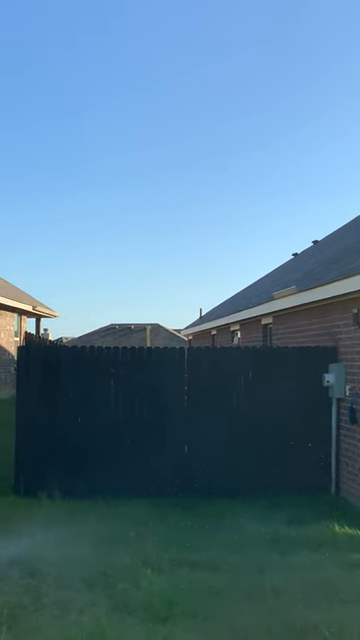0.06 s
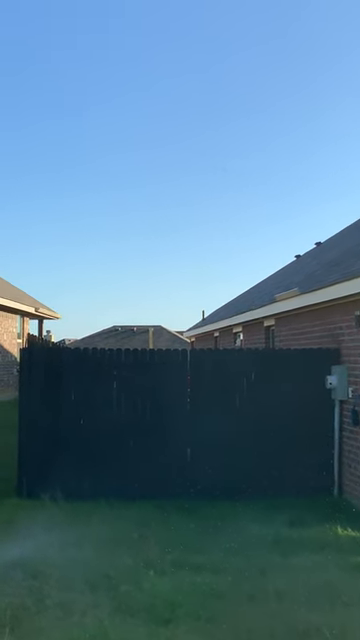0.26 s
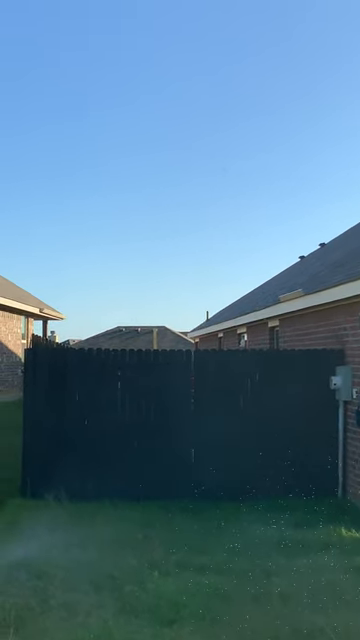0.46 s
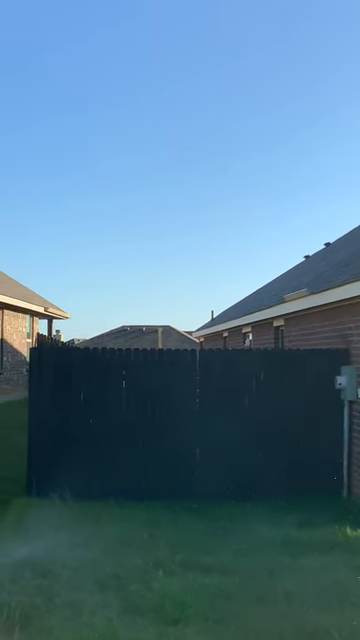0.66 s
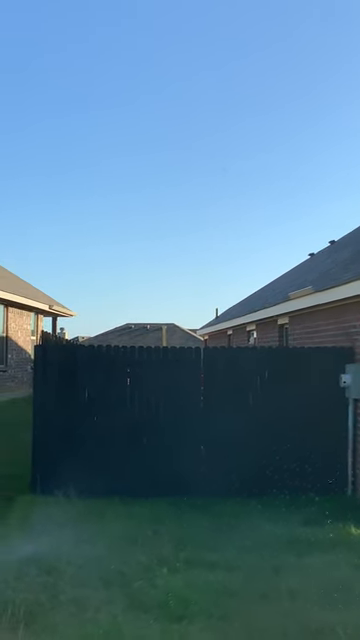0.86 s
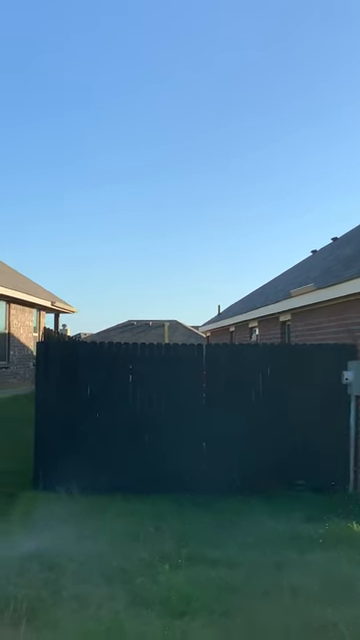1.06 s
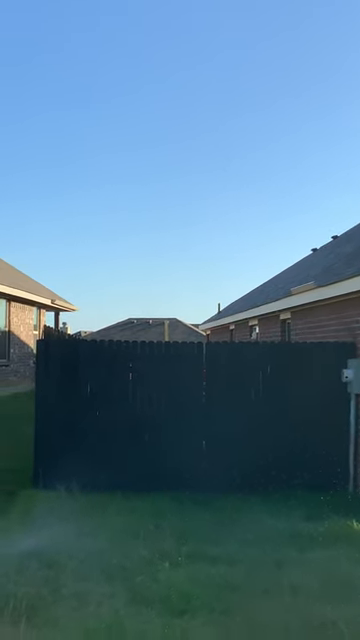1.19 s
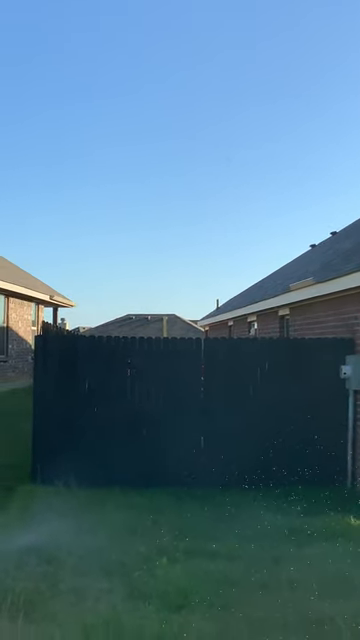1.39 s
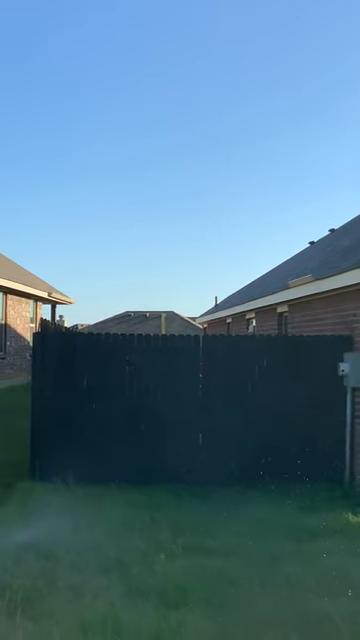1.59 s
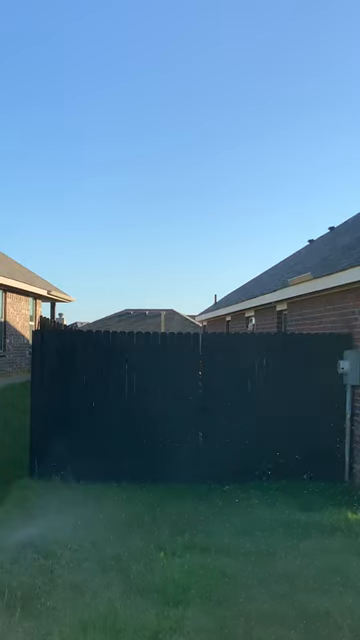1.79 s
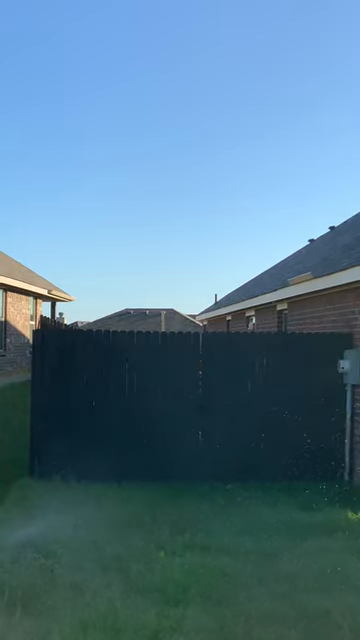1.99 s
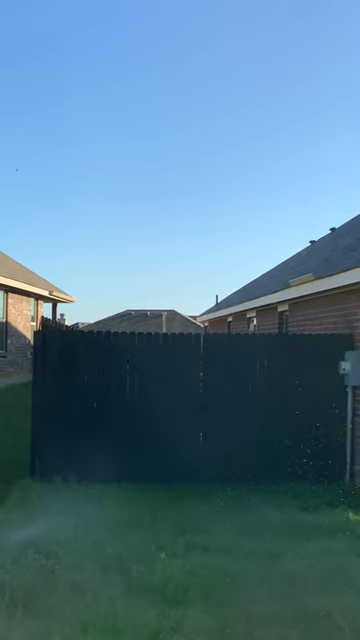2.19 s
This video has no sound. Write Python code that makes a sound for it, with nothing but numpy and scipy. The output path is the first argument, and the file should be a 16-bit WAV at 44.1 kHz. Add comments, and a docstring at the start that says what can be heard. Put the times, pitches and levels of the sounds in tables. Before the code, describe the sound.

Steady sputtering hiss of a garden sprinkler, with low wind buffeting and a faint bird whistle.

```python
"""A lawn sprinkler hisses a few metres from a hand-held phone in a fenced yard: filtered noise whose
treble bands sputter and spit as the jet breaks up. A light wind, low noise riding on gusts, rumbles
over the two microphone ports, and eddies thump them with short rough swings of pressure, some run
together into one longer thump. A far bird gives faint gliding whistles, and a faint far wash of
narrow-band noise swells once."""
import sys
import numpy as np
from scipy import signal
from scipy.fft import rfft, irfft
from scipy.io import wavfile
from scipy.ndimage import uniform_filter1d

SR = 44100
rng = np.random.default_rng(int(sys.argv[2]) if len(sys.argv) > 2 else 0)


def inscribe(sig):
    """Save sig as 16-bit PCM at rate SR to the path in sys.argv[1].

    A 1-D sig is mono; a 2-D sig holds one channel per row.
    Samples are clipped to [-1, 1] before scaling.
    """
    pcm = np.round(np.clip(np.atleast_2d(sig).T, -1, 1) * 32767)
    wavfile.write(sys.argv[1], SR, pcm.astype(np.int16))


N = 99225
T = np.arange(N) / SR
HZ = np.fft.rfftfreq(N, 1 / SR)
HALF = np.array([[.5], [-.5]])  # splits a left/right difference evenly: left row, right row

# colour of the spray at the phone, ahead of its slow level: f/Hz, level/dB per Hz
SPRAY_COLOUR = [(500, -82), (900, -84), (1500, -90), (2500, -93.5), (3100, -91), (4100, -89.5),
                (4700, -88.5), (5500, -87), (6100, -92.5), (6900, -92), (7300, -91), (8000, -85),
                (8700, -93.5), (9600, -91), (10600, -88.5), (11300, -89.5), (11900, -94), (12700, -82.4),
                (13600, -81), (14200, -87.5), (14600, -84), (15000, -78.5), (15400, -78.5), (15700, -80.5)]
# phase by which the left port leads for the spray: f/Hz, lead/rad
SPRAY_LEAD = [(0, 0), (600, 3.5), (800, 4.6), (1200, 5), (1500, 4.6), (1800, 3.14), (2300, 1.2),
              (2450, -.7), (3100, -.2), (3300, -3), (3700, -2.9), (3900, -.4), (4400, .2), (5000, 2.9),
              (5300, 1), (5950, .1), (6150, -2.3), (6750, -3.14), (6950, -5.3), (7600, -6.3), (8350, -9.3),
              (9000, -9.6), (9200, -13), (9800, -12.4), (10550, -9.4), (11100, -8.6), (11400, -6.6),
              (11900, -6), (12700, -3.14), (13600, -.3), (13900, .3), (14600, 3.14), (15300, 6),
              (15700, 6.28)]
# share of the spray's power common to both ports: f/Hz, share/0-1
SPRAY_SHARED = [(500, 0.39), (1000, 0.06), (1800, 0.98), (2400, 0.74), (2900, 0.62), (3550, 0.89),
                (4700, 0.9), (5700, 0.92), (6200, 0), (6500, 1), (6800, .99), (7200, 0.98), (8300, 0.71),
                (8700, 1), (9200, 0.75), (10200, 0.95), (11600, 0.4), (12000, 0.8), (12700, 1),
                (14200, 0.45), (14600, 0.9), (15100, 0.74), (15600, 0.24)]
# left minus right for the spray: f/Hz, level/dB
SPRAY_BALANCE = [(500, 1), (2400, 0.5), (3400, 7), (4100, -7.5), (4900, 2.5), (5600, -1.5), (6300, 6.5),
                 (6700, -11), (7200, -1), (7700, -0.5), (8100, 4), (8700, -1), (10500, -2.5), (11500, -2.5),
                 (13000, -2.5), (13800, 0), (14600, 2), (15000, -6), (15600, 6)]
# slow level of the spray: t/s, level/dB
SPRAY_FLOW = [(0, -1.5), (.4, -1.5), (1.4, -0.33), (2.25, 0)]
# treble bands that sputter, each up to the next: start f/Hz, depth factor on sputter and spits
SPUTTER_BANDS = [(1800, 0.48), (4000, 0.67), (8000, 0.62), (12000, 0.54)]
# spits of the jet; rows below the steady hiss only hold the sputter even:
# start t/s, peak level/dB ahead of the depth factor
SPITS = [(0.3651, -36), (0.5877, -35), (0.613, -37.5), (0.6494, -35), (0.6779, -38), (0.695, -36.5),
         (0.8879, -36), (0.9168, -34), (0.9383, -45), (1.067, -33), (1.148, -36.5), (1.17, -38),
         (1.291, -37), (1.8926, -34), (1.9839, -45), (2.136, -37)]
# relative colour of the wind rumble: f/Hz, level/dB per Hz
WIND_COLOUR = [(12, -52), (20, -3.5), (43, 1), (70, -1), (129, -6), (335, -18), (600, -46), (780, -63),
               (1320, -120)]
# level of the wind rumble: t/s, level/dB
GUSTS = [(0.0, -43.5), (0.22, -42), (0.36, -40.5), (0.79, -42), (0.91, -29.5), (1.05, -44), (1.16, -37.5),
         (1.4, -39.5), (1.52, -40.5), (1.68, -40), (2.25, -44.5)]
# pressure swings of the eddies, some run together into one longer thump:
# middle t/s, level/dB, f/Hz, length/cycles, left minus right level/dB
EDDY_SWINGS = [(0.214, -32.5, 46, 3, -2), (0.327, -32.5, 86, 1.2, 2), (.432, -33.5, 176, 1.74, 1),
               (0.45, -28, 48.5, 1.7, 2), (0.505, -32.5, 190, 1.36, 1), (.515, -33.5, 52, 2.6, 4),
               (0.702, -39, 53.6, 0.64, 7), (0.741, -33, 60.4, 0.73, 1), (0.82, -27.5, 55.7, 0.51, -6),
               (0.887, -33.5, 97, 2.5, -1), (1, -26, 44.7, 0.31, -1), (1.19, -31, 94, 1.4, 4),
               (1.236, -29, 46, 1.15, 5), (1.491, -30.5, 202, 1.65, 0), (1.553, -31.5, 49.5, 1.1, -7),
               (0.614, -31, 72.5, 0.9, 1), (0.681, -29, 184, 1.97, 3.5), (0.844, -33, 350, 1.9, -8.5),
               (0.855, -44, 152, 1.7, 3), (.94, -37, 390, 3, -7), (0.96, -28.5, 375, 1.9, -2.5),
               (1.465, -40, 90, 1.1, -7), (1.515, -34.5, 130, 1.8, -7), (1.586, -31, 99, 2.2, -4),
               (.428, -42, 289, 1.3, 3), (0.502, -40.5, 300, 1.5, -6), (.678, -37.5, 330, 1.6, 3.5),
               (1.53, -39, 330, 1.4, 4), (1.897, -43, 300, 3.3, 1), (2.015, -40.5, 253, 2.5, -2),
               (1.244, -34.5, 300, 2, -5), (1.6172, -25.5, 185, 1.6, -1), (0.9187, -12.5, 103, 1.2, -1),
               (0.927, -18, 206, 1.5, 1), (0.9363, -15, 55, .75, 4.5), (.969, -15.5, 69, 0.97, 0.5),
               (1.078, -32, 78.5, 2.35, 1), (1.186, -18, 252.4, 2.6, -2), (1.253, -28.5, 137, 2.4, -2),
               (1.394, -30.5, 67.5, 4.1, -5), (1.426, -30, 127, 1.8, 1), (1.533, -17, 177, 0.85, 1),
               (1.624, -21.5, 92, 1.5, 1), (1.668, -34, 68, 2.3, 0), (1.766, -29, 60, 0.75, 4),
               (1.899, -29, 46.3, 2.7, -3), (1.984, -28.5, 52.4, 1.65, 5), (2.1, -30, 85, 1.3, 4),
               (2.179, -35.5, 43.6, 1.4, 0)]
# far bird: start t/s, length t/s, first f/Hz, last f/Hz, level/dB, left lead/rad
WHISTLES = [(0.415, 0.043, 2450, 1990, -62.5, 0.5), (0.564, 0.039, 2400, 2000, -61, 1.5),
            (2.013, 0.099, 2000, 1990, -56.5, 3), (2.133, 0.051, 1995, 2010, -63, 2.5)]

# sputter ahead of the depth factor: common to all bands, then each band's own
SPUTTER_DB, SPUTTER_PER_S, OWN_SPUTTER_DB, OWN_SPUTTER_PER_S = 1.9, 110, 1.0, 130
SURGE_DB, SURGE_PER_S = [0.43, 0.87, 0.9, 1.6], 75  # slower surges, one depth per band
SPIT_S, SPIT_STEADY_DB = .005, -42  # length of a spit; peak of the steady hiss
PATCH_DB, PATCH_HZ, PATCH_S = 2.5, 70, .06  # patches of colour: depth, width, length
SWAY_S, SWAY_PER_S = 3e-6, 5.3  # the hand turns the phone a little: spread of the lag between ports
WIND_FLICKER_DB, WIND_FLICKER_PER_S = 1.5, 24
WIND_LAG_S, WIND_SHARED = .0009, 0.76  # air reaches the left port first; power share common to both
EDDY_FALL = 0.2  # share by which the phase is bent: ahead of the middle faster, after it slower
EDDY_ROUGH, EDDY_OWN = 0.28, 0.53  # noise against swing; each port's own noise against the common
EDDY_SAMPLES = 8192
WHISTLE_WAVER_DB, WHISTLE_WAVER_PER_S = 1.5, 100
WASH_AT_S, WASH_S, WASH_HZ, WASH_WIDTH_HZ = 1.9, 0.25, 1270, 260
WASH_DB, WASH_FLICKER_DB, WASH_FLICKER_PER_S = -65, 2.5, 24.93
TOP_HZ = 15760


def undb(db):
    """Decibels to gain."""
    return 10 ** (np.asarray(db) / 20)


def over(table, x):
    """Straight lines between the rows of a two-column table."""
    return np.interp(x, *np.array(table, float).T)


def walk(rate):
    """Random levels, about `rate` a second, joined by straight slews; spread 1."""
    k = int(SR / rate) + 1
    steps = np.repeat(rng.standard_normal(N // k + 1), k)[:N]
    w = uniform_filter1d(steps, k)
    return w / w.std()


def flutter(rate):
    """A walk with its slow drift taken out."""
    w = walk(rate)
    return w - uniform_filter1d(w, int(5 * SR / rate) + 1)


def ports(common, gain, lead, shared, own):
    """Two ports: a common part with a phase lead at the left, the rest each port's own noise."""
    shared = np.clip(shared, 0, 1)
    turn = np.exp(1j * lead * HALF)
    together = np.sqrt(shared) * rfft(common) * turn
    alone = np.sqrt(1 - shared) * rfft(own)
    return irfft(gain * (together + alone), N)


def sputtering_jet():
    """Three noises (common, left, right): treble bands sputter together and alone, the low end does not."""
    shared_db = SPUTTER_DB * flutter(SPUTTER_PER_S)
    for t, peak_db in SPITS:
        spit = (T > t) & (T < t + SPIT_S)
        shared_db = np.where(spit, max(peak_db - SPIT_STEADY_DB, 0), shared_db)
    edges = [hz for hz, _ in SPUTTER_BANDS] + [SR]
    noise = irfft(rfft(rng.standard_normal((3, N))) * (HZ < edges[0]), N)
    surge = flutter(SURGE_PER_S)
    for (low_hz, depth), high_hz, surge_db in zip(SPUTTER_BANDS, edges[1:], SURGE_DB):
        sputter_db = depth * (shared_db + OWN_SPUTTER_DB * flutter(OWN_SPUTTER_PER_S))
        sputter = undb(sputter_db + surge_db * surge)
        jet = rng.standard_normal((3, N)) * sputter / np.sqrt(np.mean(sputter ** 2))
        noise = noise + irfft(rfft(jet) * (HZ >= low_hz) * (HZ < high_hz), N)
    return noise


def patchy(x):
    """Shifting colour: neighbouring frequencies swell and dip together for a moment, alike at both ports."""
    f, t, z = signal.stft(x, SR, nperseg=1024)
    field = rng.standard_normal(z.shape[1:])
    field = uniform_filter1d(field, int(PATCH_HZ / f[1]) + 1, axis=0)
    field = uniform_filter1d(field, int(PATCH_S / t[1]) + 1, axis=1)
    gain = undb(PATCH_DB * field / field.std())
    gain = gain / np.sqrt(np.mean(gain ** 2))
    return signal.istft(z * gain, SR, nperseg=1024)[1][:, :N]


def spray():
    """Hiss of the breaking jet: sputtering noise, coloured, spread over the ports and swayed by the hand."""
    noise = sputtering_jet()
    gain = undb(over(SPRAY_COLOUR, HZ)) * np.sqrt(SR / 2)  # dB per Hz to gain on unit noise
    gain = gain * np.clip(HZ / 400, 0, 1) ** 2  # fade out the lows
    gain = gain * undb(HALF * over(SPRAY_BALANCE, HZ))
    hiss = ports(noise[0], gain, over(SPRAY_LEAD, HZ), over(SPRAY_SHARED, HZ), noise[1:])
    hiss = patchy(hiss)
    # a tiny time shift is the signal's slope times the lag
    slope = irfft(2j * np.pi * HZ * rfft(hiss), N)
    swayed = hiss + HALF * SWAY_S * walk(SWAY_PER_S) * slope
    return undb(over(SPRAY_FLOW, T)) * swayed


def wind():
    """Low turbulence over the ports: coloured noise that flickers and follows the gusts."""
    noise = rng.standard_normal((3, N)) * undb(WIND_FLICKER_DB * walk(WIND_FLICKER_PER_S))
    rows = [(np.log(hz), db) for hz, db in WIND_COLOUR]
    gain = undb(over(rows, np.log(HZ + 1)))
    gain = gain * (HZ > WIND_COLOUR[0][0]) / (1 + (HZ / 650) ** 8)
    rumble = ports(noise[0], gain, 2 * np.pi * HZ * WIND_LAG_S, WIND_SHARED, noise[1:])
    return rumble / rumble.std() * undb(over(GUSTS, T))


def eddies():
    """Thumps of short pressure swings under bells, roughened by noise; some run into one longer thump."""
    out = np.zeros((2, N))
    noise = rng.standard_normal((len(EDDY_SWINGS), 3, EDDY_SAMPLES))
    offset = np.arange(EDDY_SAMPLES) - EDDY_SAMPLES // 2
    f = np.fft.rfftfreq(EDDY_SAMPLES, 1 / SR)
    lead_s = HALF * WIND_LAG_S
    port_t = offset / SR + lead_s
    for (at, db, hz, cycles, pan_db), chance in zip(EDDY_SWINGS, noise):
        both = rfft(chance[2]) * np.exp(2j * np.pi * f * lead_s) + EDDY_OWN * rfft(chance[:2])
        band = np.exp(-(np.log((f + 1) / hz / 1.29) / 0.79) ** 2) / (1 + (f / 520) ** 8)
        rough = irfft(both * band)
        place_in_swing = port_t * hz / cycles
        bend = 1 - EDDY_FALL * np.tanh(place_in_swing)
        swing = -np.sin(2 * np.pi * hz * port_t * bend) + EDDY_ROUGH * rough / rough.std()
        bell = np.exp(-(2 * place_in_swing) ** 2)
        push = swing * bell * undb(db + HALF * pan_db)
        place = int(at * SR) + offset
        inside = place < N
        out[:, place[inside]] += push[:, inside]
    return out


def bird():
    """Far whistles: near-sine glides with a wavering level under a soft bell."""
    out = 0
    for start, length, first_hz, last_hz, db, lead in WHISTLES:
        u = np.clip((T - start) / length, 0, 1)
        phase = 2 * np.pi * np.cumsum(first_hz + (last_hz - first_hz) * u) / SR
        level = undb(db + WHISTLE_WAVER_DB * walk(WHISTLE_WAVER_PER_S))
        bell = np.sqrt(2 * np.sin(np.pi * u))
        out = out + level * bell * np.sin(phase + lead * HALF)
    return out


def wash():
    """Faint far wash: a narrow, flickering band of noise under one slow swell, alike at both ports."""
    shape = np.exp(-((HZ - WASH_HZ) / WASH_WIDTH_HZ) ** 2)
    band = irfft(rfft(rng.standard_normal(N)) * shape, N)
    level = undb(WASH_DB + WASH_FLICKER_DB * walk(WASH_FLICKER_PER_S))
    swell = np.exp(-((T - WASH_AT_S) / WASH_S) ** 2)
    return band / band.std() * level * swell


def scene():
    """Spray, wind, thumps, bird and far wash summed at the two ports."""
    return spray() + wind() + eddies() + bird() + wash()


def record(dry):
    """The phone cuts the top with a steep low-pass."""
    low_pass = signal.ellip(14, .2, 70, TOP_HZ, fs=SR, output="sos")  # order, ripple dB, stop dB
    return signal.sosfilt(low_pass, dry)


dry = scene()
out = record(dry)
inscribe(out)
```